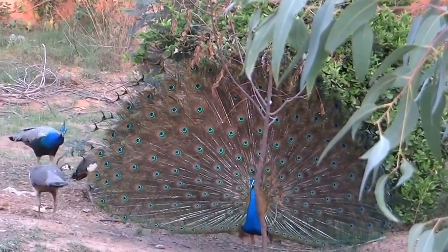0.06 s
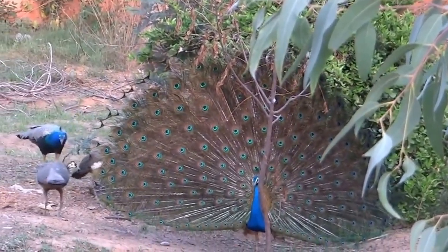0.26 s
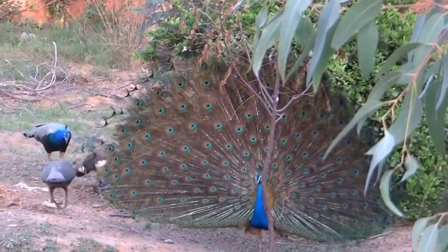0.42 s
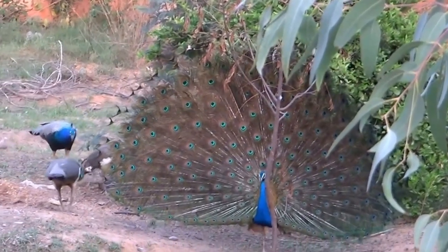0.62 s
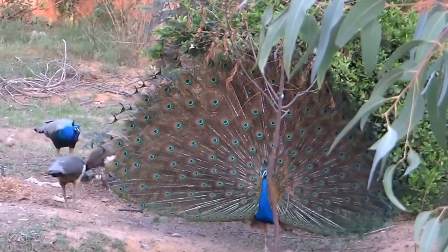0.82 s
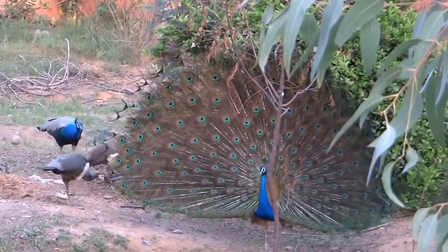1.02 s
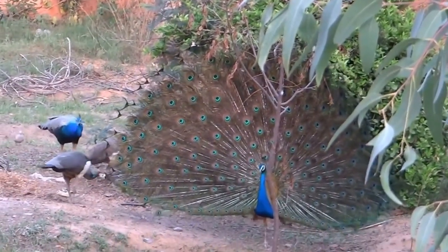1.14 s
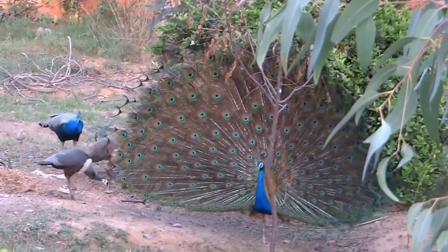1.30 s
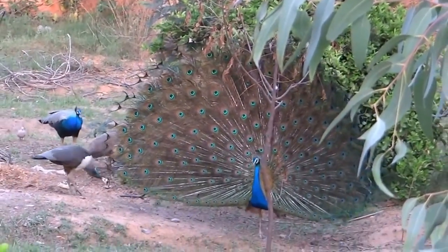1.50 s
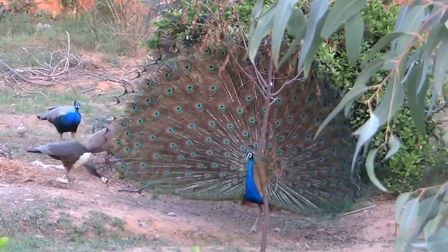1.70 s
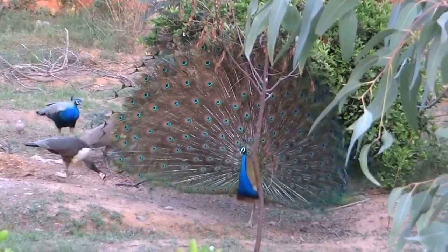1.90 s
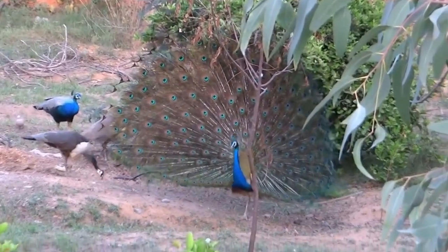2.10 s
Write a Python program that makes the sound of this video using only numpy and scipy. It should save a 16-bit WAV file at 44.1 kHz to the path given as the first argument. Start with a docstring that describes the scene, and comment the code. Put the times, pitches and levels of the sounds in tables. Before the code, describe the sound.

Peafowl call close by over quiet outdoor air. A wavering squeal at about 0.3 seconds leads into a run of high, raspy squawks that rise and fall, overlapping and faintly echoing until about 1.9 seconds. Distant birds answer and wail softly at the start and again around 1.5 seconds. Dull bumps sound near the microphone between 0.9 and 1.7 seconds, and two faint ticks follow at about 2.1 seconds.

```python
"""A dry garden: several peafowl chicks close by squawk, rasp and squeal, their high, arching calls
overlapping and faintly echoed. Birds further off answer and wail. Each voice is a stack of harmonics
shaped by the throat; strain makes it flutter and hiss, and ground, bushes and trees scatter it back.
Dull bumps and two ticks sound close to the microphone, over quiet outdoor air."""
import sys
import numpy as np
from scipy import signal
from scipy.fft import rfft, irfft
from scipy.io import wavfile

SR = 44100
rng = np.random.default_rng(int(sys.argv[2]) if len(sys.argv) > 2 else 0)


def store_wav(level_fs):
    """Save 16-bit WAV to argv[1]."""
    pcm = np.round(np.clip(np.atleast_2d(level_fs), -1, 1) * 32767)
    wavfile.write(sys.argv[1], SR, pcm.T.astype(np.int16))


N = 94815
TOP_HZ, GARDEN_T60_S = 15850, 0.99
# drive of the distant voices' harmonics, from the fundamental up (level [dB])
FAR_DRIVE = [-1.5, 6, 7, 5, 4, -19]


def undb(db):
    """Decibels to gain."""
    return 10 ** (np.asarray(db) / 20)


def response(curve, hz):
    """Gain at hz of an EQ curve (frequency [Hz], level [dB])."""
    corners_hz, db = np.array(curve).T
    return undb(np.interp(np.log(np.maximum(hz, 1)), np.log(corners_hz), db))


def noise(colour):
    """Noise coloured by an EQ curve, at rms 1."""
    hz = np.arange(N // 2 + 1) * SR / N
    x = irfft(rfft(rng.standard_normal(N)) * response(colour, hz), N)
    return x / x.std()


def wander(rate_hz):
    """Smooth random modulation up to about rate_hz, with spread 1."""
    hz = np.arange(N // 2 + 1) * SR / N
    x = irfft(rfft(rng.standard_normal(N)) / (1 + (hz / rate_hz) ** 4), N)
    return x / x.std()


def wide_noise(colour, side):
    """Stereo noise: a centre plus an out-of-phase side signal."""
    return noise(colour) + side * noise(colour) * np.array([[1], [-1]])


def pan(x, pan_db):
    """Pan by the level of left over right."""
    return x * undb(np.array([[pan_db], [-pan_db]]) / 2)


def decay(start_s, decay_s):
    """Envelope with an instant attack and an exponential fall."""
    age = np.arange(N) / SR - start_s
    return (age >= 0) * np.exp(-np.maximum(age, 0) / decay_s)


def outdoors(x, pan_db, tail_db, t60_s):
    """Direct sound, quick scatter from nearby ground and bushes, and a long tail from the trees."""
    t = np.arange(SR) / SR
    tail = rng.standard_normal((2, SR)) * np.exp(-np.log(1000) * t / t60_s)
    tail *= undb(tail_db) / np.linalg.norm(tail, axis=1, keepdims=True)
    scatter = rng.standard_normal(SR) * t * np.exp(-t / .008)  # densest at 8 ms
    scatter *= undb(-13) / np.linalg.norm(scatter)
    reflections = signal.fftconvolve(x[None], tail + scatter, axes=1)[:, :N]
    return pan(x, pan_db) + pan(reflections, pan_db / 2)


def voice(calls, throat, drive_db, hiss_db):
    """Hoarse harmonics through a throat; roughness (capped at 1) adds jitter, hiss, then flutter."""
    # colour of the hiss in a strained voice (frequency [Hz], level [dB])
    hiss_colour = [(300, -26.5), (1200, -8), (2050, 1), (2700, 0.5), (3800, 8.5), (4900, 1.5), (6800, -0.5),
                   (9000, -2), (10300, -15), (12000, -34)]
    flutter_hz, flutter_depth = 124.4, 0.13
    t, out = np.arange(N) / SR, np.zeros(N)
    flutter_rate = flutter_hz * (1 + 0.2 * wander(rate_hz=60.2))
    flutter = flutter_depth * np.sin(2 * np.pi * np.cumsum(flutter_rate) / SR)
    jitter = .04 * wander(rate_hz=560)
    shimmers = [.6 * wander(rate_hz=250) for _ in drive_db]  # each harmonic's level flickers
    hiss = undb(hiss_db) * noise(hiss_colour)
    for call in calls:
        times, hz, db, rough = np.array(call).T
        start, end = times[0] - .002, times[-1] + .005  # attack and release
        on = (t > start) & (t < end)
        gate = np.interp(t[on], [start, times[0], times[-1], end], [0, 1, 1, 0])
        hz, db, rough = (np.interp(t[on], times, v) for v in (hz, db, np.clip(rough, 0, 1)))
        hoarse = np.sqrt(np.maximum(rough, .14))  # never quite clean
        strain = np.interp(rough, [.35, .8], [0, 1])
        pitch = hz * (1 + strain * flutter[on] + hoarse * jitter[on])
        phase = 2 * np.pi * np.cumsum(pitch) / SR
        tone = 0
        for k, (harmonic_db, shimmer) in enumerate(zip(drive_db, shimmers), 1):
            gain = undb(harmonic_db) * response(throat, k * pitch) * (k * pitch < TOP_HZ)
            tone += gain * np.sin(k * phase) * (1 + hoarse * shimmer[on])
        out[on] += gate * undb(db) * (np.sqrt(2) * tone + rough ** 1.25 * hiss[on])
    return out


def air():
    """A wide, quiet bed of outdoor air over a faint low rumble, both drifting in level."""
    # colours of the air and the rumble (frequency [Hz], level [dB])
    air_colour = [(30, -18), (120, -27), (300, -6.5), (650, 1.5), (1200, -0.5), (2000, 5), (3000, -2.5),
                  (4300, -2), (6000, -7), (8000, -7), (15500, -28.5)]
    rumble_colour = [(20, -34), (55, 1.5), (170, 3), (500, -5), (2000, -70)]
    # their fader moves (time [s], level [dB])
    air_level = [(0, -48), (.3, -53.5), (0.501, -49), (1.2, -52), (2.15, -51)]
    rumble_level = [(.35, -82), (.5, -67), (.7, -81.5), (1.1, -69), (1.8, -67.5), (2.15, -72)]
    t = np.arange(N) / SR
    bed = wide_noise(air_colour, side=0.42) * undb(np.interp(t, *np.array(air_level).T))
    rumble = noise(rumble_colour) * undb(np.interp(t, *np.array(rumble_level).T))
    return bed + rumble


def ticks():
    """Two dry clicks of noise, each with a brief rustle."""
    # the clicks (time [s], level [dB])
    clicks = [(2.0945, -37), (2.1122, -39.5)]
    # their colour (frequency [Hz], level [dB])
    colour = [(50, -13.5), (160, -1), (400, -46), (1200, -12), (1900, -7), (2800, -7.5), (3800, -41),
              (15000, -27)]
    envelope = sum(undb(db) * (decay(at, 0.0043) + undb(-13.5) * decay(at, 0.0058)) for at, db in clicks)
    return noise(colour) * envelope


def bumps():
    """Soft knocks near the microphone: a short crack, a scuffing tail and a few low modes."""
    # the knocks (time [s], level [dB], relative ring level [dB])
    knocks = [(0.861, -38.5, -13), (0.975, -35, -6.5), (1.135, -28.5, -6.5), (1.322, -50, 5),
              (1.333, -39, -14), (1.407, -25.5, -5), (1.675, -39, -23)]
    # colour of crack and scuff (frequency [Hz], level [dB])
    colour = [(90, -13), (280, 5.5), (650, 0.5), (1500, -3), (3000, -11), (7000, -16.5), (15000, -33)]
    # resonances each knock rings (frequency [Hz], level [dB], t60 [s])
    modes = [(62.4, -5, 0.132), (113.5, -13.5, 0.098), (187, 4.5, 0.029), (237, -15.5, 0.7),
             (333, -10, 0.045), (589, -9.5, 0.091)]
    t, out = np.arange(N) / SR, 0
    grit = wide_noise(colour, side=0.93)
    for at, db, ring_db in knocks:
        ring = sum(undb(mode_db) * decay(at, t60 / np.log(1000)) * np.sin(2 * np.pi * hz * (at - t))
                   for hz, mode_db, t60 in modes)
        crack = undb(0.5) * decay(at, 0.0028)
        scuff = undb(-13) * decay(at, 0.018)
        out += undb(db) * (pan(grit * (crack + scuff), pan_db=-4) + undb(ring_db) * ring)
    return out


def distant_wails():
    """Lower, drawn-out cries from far away, dark in tone and washed in a long tail."""
    # one contour per wail (time [s], pitch [Hz], level [dB], roughness)
    calls = [
        [(.05, 1928, -56, 0.22), (.24, 1741, -52.5, 0.2)],
        [(.6, 1310, -48.5, 0.53), (.69, 1400, -51, 0.6)],
        [(1.505, 1146, -55, 0.64), (1.56, 1300, -46, 0.22), (1.61, 1292, -44.5, 0.46),
         (1.68, 1202, -45.5, 0.65), (1.715, 1153, -51.5, 0.61)],
    ]
    # dark throat response (frequency [Hz], gain [dB])
    throat = [(600, 32), (1250, -3), (2000, 3.5), (3900, -37), (9000, -80)]
    wails = voice(calls, throat, FAR_DRIVE, hiss_db=0.5)
    return outdoors(wails, pan_db=-1, tail_db=-2, t60_s=2.6)


def answers_and_echoes():
    """Short, rich replies from birds further off, and faint, nearly pure echoes of the near squawks."""
    # one contour per answer or echo (time [s], pitch [Hz], level [dB], roughness)
    answer_calls = [
        [(0, 2696, -50, 0.21), (.03, 2450, -48, 0.12), (.11, 1860, -84, 0.15)],
        [(.09, 4700, -61, 0.09), (.13, 5070, -55, 0.048), (.18, 6300, -49, 0.071)],
        [(.176, 1136, -57, 0.12), (.202, 1460, -48.5, 0.26), (.218, 1280, -47, 0.19), (.235, 1502, -50.5, 0.27)],
        [(.228, 1023, -56, 0.15), (.242, 1087, -49.5, 0.15), (.263, 1056, -46, 0.11), (.292, 987, -59.5, 0.15)],
        [(1.385, 3020, -47, 0.31), (1.43, 2600, -44, 0.32), (1.458, 2370, -53, 0.27)],
    ]
    echo_calls = [
        [(.59, 3122, -38.5, 0.29), (.628, 3143, -41.5, 0.66)],
        [(.868, 2480, -33.5, 0.48), (.91, 2566, -44.5, 0.64)],
        [(1.675, 2267, -49, 0.2), (1.708, 1949, -43, 0.18)],
    ]
    # throat response with a soft top (frequency [Hz], gain [dB])
    throat = [(600, -38), (1300, -4), (2200, -4.5), (3200, 0), (4200, -5), (5200, -6.5), (6300, -16.5),
              (7700, -27), (9000, -48), (12000, -58)]
    # drive of an echo's fundamental and octave (level [dB])
    echo_drive = [0, -17]
    answers = voice(answer_calls, throat, FAR_DRIVE, hiss_db=0.5)
    echoes = voice(echo_calls, throat, echo_drive, hiss_db=0.5)
    return outdoors(answers + echoes, pan_db=-3.5, tail_db=-8, t60_s=GARDEN_T60_S)


def near_chicks():
    """Several chicks close by: overlapping squawks that strain into a rasp, and one wavering squeal."""
    # one contour per squawk, and the squeal's (time [s], pitch [Hz], level [dB], roughness)
    squawk_calls = [
        [(.296, 3450, -27.5, 0.5), (.305, 3270, -43, 0.6)],
        [(.414, 1700, -40, 0), (.423, 1920, -28.5, 0.47), (.438, 1870, -31.5, 0.89)],
        [(.438, 2804, -40, 0.1), (.445, 3320, -24.5, 0.18), (.481, 3120, -33.5, 1.1)],
        [(.481, 2064, -31.5, .75), (.52, 1960, -31.5, 0.9), (.565, 1850, -35, 1.11), (.585, 1500, -37.5, 1)],
        [(.694, 1400, -31, 0.65), (.701, 1634, -34, 0.17), (.705, 1779, -24, 0.32), (.72, 2150, -29.5, 0.54),
         (.742, 2500, -29.5, 0.49), (.768, 2380, -33.5, 0), (.79, 2300, -26.5, 0.22), (.815, 2180, -24.5, 0.08),
         (.835, 2090, -31.5, 0.28), (.845, 2040, -26.5, 0.19), (.862, 1970, -31, 0.07)],
        [(.747, 3210, -32, 0.3), (.764, 3420, -31.5, 0.2)],
        [(.772, 2060, -28.5, 0.66), (.795, 1850, -29.5, 0.53), (.82, 1650, -29.5, 0.4), (.838, 1400, -29, 0.48)],
        [(.959, 1450, -28, 0.42), (.967, 1988, -25.5, 0), (.974, 2660, -26, 0.42)],
        [(.976, 3100, -30, 0.2), (1.002, 3236, -25.5, 0.2), (1.023, 3040, -29.5, 0.07)],
        [(1.023, 2406, -27.5, 0.08), (1.04, 2160, -27.5, 0.22), (1.047, 2024, -25, 0.18),
         (1.062, 1870, -30, 0.61), (1.095, 1380, -30, 0.41)],
        [(1.15, 2137, -46, 0), (1.226, 2270, -35, 0.2), (1.241, 2190, -27.5, 0), (1.26, 2116, -31, 0),
         (1.275, 2047, -25.5, 0), (1.33, 1740, -56, 0)],
        [(1.229, 1400, -31.5, 0.2), (1.235, 1970, -30.5, 0.25), (1.248, 2480, -27.5, 0.45),
         (1.285, 2294, -31.5, 0.24), (1.31, 2115, -28, 0.48), (1.326, 1997, -25.5, 0.34),
         (1.338, 1825, -32, 1.17), (1.353, 1400, -38.5, 0.77)],
        [(1.485, 1538, -42, 0.42), (1.492, 1885, -29.5, 0.07), (1.502, 2270, -27.5, 0.08), (1.53, 2315, -26, 0),
         (1.547, 2210, -27.5, .2), (1.568, 2120, -24, 0.05), (1.595, 2000, -32.5, 0.42),
         (1.612, 1950, -28, 0.48), (1.635, 1830, -35.5, 0.8), (1.665, 2036, -42, 0.65), (1.72, 1900, -49, 0.65)],
        [(1.786, 1407, -46.5, 0.51), (1.803, 2164, -35.5, 0.57), (1.835, 2470, -30.5, 0.03),
         (1.866, 2400, -33.5, 0.42), (1.876, 2090, -27, 0), (1.897, 1667, -42.5, 0.86)],
    ]
    squeal_call = [(.314, 5430, -15, 0.1), (.317, 4284, -32, 0.11), (.320, 2843, -32, 0.49),
                   (.330, 2340, -31, 0.42), (.334, 3480, -27, .15), (.341, 3385, -24.5, 0.21),
                   (.345, 2545, -29, 0.81), (.349, 3490, -28.5, 0.13), (.354, 3510, -16, 0.16),
                   (.358, 2850, -33, 0.724), (.362, 3480, -19, .1), (.371, 3316, -27.5, 0.35),
                   (.375, 4590, -30, 0.062), (.380, 3050, -23, 0.054), (.391, 2630, -21, 0.093),
                   (.405, 2450, -25.5, 0.085), (.412, 2445, -21, 0.084)]
    # bright throat response (frequency [Hz], gain [dB])
    throat = [(500, -48), (1200, -71), (1700, -15.5), (2300, -12.5), (3300, -5.5), (4200, -4.5),
              (4650, -14), (5100, -19), (6500, -17), (7300, -15.5), (8600, -15), (9400, -16),
              (10200, -22.5), (11400, -32.5), (12200, -66)]
    # drive of the harmonics, from the fundamental up (level [dB]); squawks favour the even ones
    squawk_drive = [0, 0, -8, -2, -9, -6]
    squeal_drive = [2, -7.5, -14.5]
    squawks = voice(squawk_calls, throat, squawk_drive, hiss_db=-4)
    squeal = voice([squeal_call], throat, squeal_drive, hiss_db=-4.5)
    return outdoors(squawks + squeal, pan_db=-4.3, tail_db=-11.7, t60_s=GARDEN_T60_S)


def scene():
    """Near and far birds, close knocks and ticks, and the air bed."""
    return near_chicks() + answers_and_echoes() + distant_wails() + bumps() + ticks() + air()


def record(dry):
    """A steep low-pass cuts the very top of the mix."""
    return signal.sosfilt(signal.ellip(10, .2, 80, TOP_HZ, fs=SR, output="sos"), dry)


dry = scene()
out = record(dry)
store_wav(out)
```